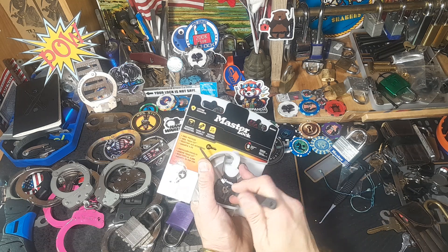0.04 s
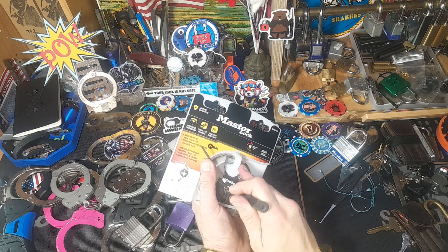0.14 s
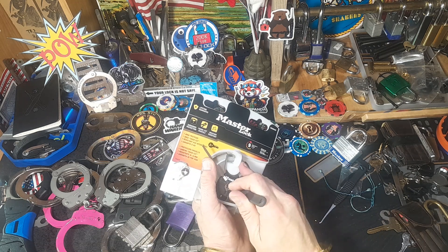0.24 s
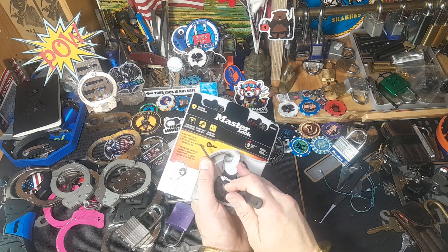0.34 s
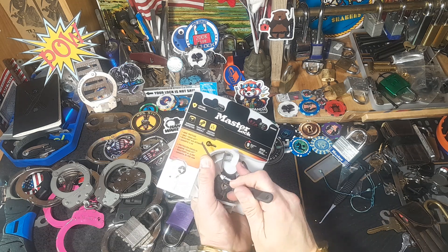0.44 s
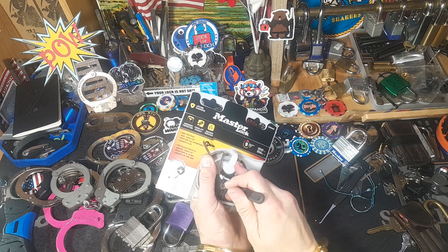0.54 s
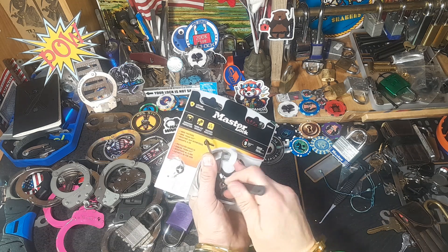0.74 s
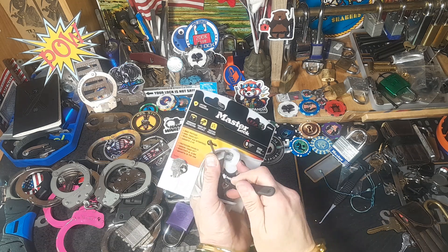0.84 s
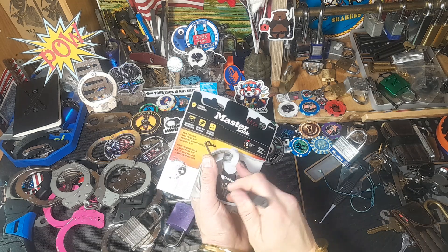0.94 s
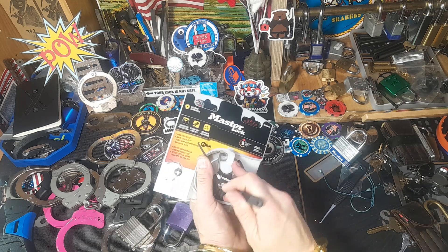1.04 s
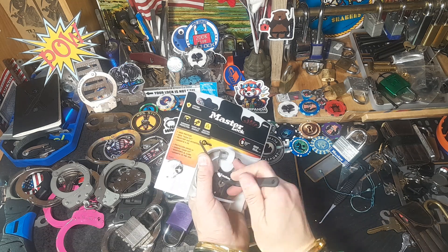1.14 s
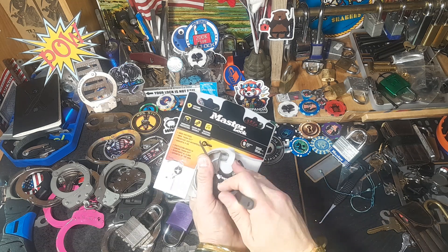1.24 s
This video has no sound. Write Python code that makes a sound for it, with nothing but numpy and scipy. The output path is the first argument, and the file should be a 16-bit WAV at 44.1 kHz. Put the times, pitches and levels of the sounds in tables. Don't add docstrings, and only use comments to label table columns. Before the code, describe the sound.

A metal pick rakes a padlock's pins, making sharp irregular clicks, gritty scratches and brief rings.

```python
import sys
import numpy as np
from scipy import signal
from scipy.io import wavfile
from scipy.ndimage import uniform_filter1d

SR = 44100
rng = np.random.default_rng(int(sys.argv[2]) if len(sys.argv) > 2 else 0)


def boost(x):
    u = np.asarray(x, float) / 20
    return 10 ** u


def log_audio(samples):
    frames = np.atleast_2d(samples).T
    limited = np.clip(frames, -1, 1)
    pcm = np.round(limited * 32767).astype(np.int16)
    wavfile.write(sys.argv[1], SR, pcm)


N = 57330

# f/Hz, level/dB per Hz
AIR_SPECTRUM = [(50, 10.5), (100, 8.5), (400, 7), (800, -11), (1300, -2.5), (3200, -5.5), (8000, -7.5),
                (15000, -18)]
# f/Hz, width/Hz, level/dB
HUM_BANDS = [(92.3, 30, 2.5), (176.7, 13.2, -1.5), (273.2, 13, -7), (336.6, 20, -7.5)]
# t/s, level/dB
HUM_SWELL = [(0, -77), (.2, -78.5), (.3, -71.5), (.4, -78.5), (.49, -68.5), (.6, -75), (.7, -71.5),
             (.9, -77.5), (1.3, -93)]
# start t/s, length t/s, start level/dB, end level/dB, centre
# f/Hz
SCRAPES = [(0, 0.031, -54.5, -70, 5360), (0.21, 0.014, -53.5, -38, 9400), (0.2258, 0.0046, -33, -28, 14200),
           (0.426, 0.016, -47.5, -61, 8000), (0.4423, 0.0075, -50, -31.5, 12400),
           (0.592, 0.011, -60, -55.5, 8100), (0.6264, 0.011, -42.5, -38, 14000),
           (0.8044, 0.065, -50.5, -70.5, 7060), (0.819, 0.0039, -44, -40.5, 9800),
           (0.917, 0.0075, -55.5, -52, 4340), (0.9717, 0.0098, -48, -38.5, 8000),
           (1.136, 0.071, -62, -71, 3700), (1.24, 0.05, -54, -66.5, 6900), (0.23, 0.054, -35, -53.5, 4400),
           (0.636, 0.056, -34, -51.5, 4170), (1.0752, 0.0075, -57, -62, 7500),
           (1.111, 0.0046, -62, -66, 14500), (1.163, 0.0079, -49.5, -56.5, 9000),
           (.452, 0.045, -55.5, -58, 8000), (0.625, 0.025, -35, -62, 12500)]
# f/Hz, level/dB, t60/s
ROOM_BANDS = [(310, -7, 0.15), (1170, -6.5, 0.16), (3240, -12.5, 0.097), (8000, -14.5, 0.18),
              (14000, -8.5, 0.13)]
TICK_TIMES = [0.0193, 0.0703, 0.1647, 0.1787, 0.1955, 0.204, 0.2139, 0.2165, 0.229, 0.3548, 0.388, 0.4273,
              0.4383, 0.4501, 0.5984, 0.6297, 0.6353, 0.7791, 0.8091, 0.8242, 0.9196, 0.9601, 0.9775,
              1.0774, 1.1408, 1.1651, 1.1798, 1.2373, 1.2503, 1.2916, .4462, .8183, .8259, .8285, .9762,
              .9812, .9830, 1.2385, 1.2567, 1.2350]
# middle level/dB, low level/dB, high level/dB
TICK_LEVELS = [(-68, -66, -55), (-47, -86, -53.5), (-41, -38, -39.5), (-41.5, -38, -73), (-58, -43.5, -49),
               (-45, -56, -57), (-56, -38, -29), (-36, -31, -25), (-24, -16, -38), (-47, -74, -50),
               (-49, -68, -48), (-59, -44, -39), (-47, -45, -27), (-33, -36, -20.5), (-32.5, -36.5, -34.5),
               (-32, -26, -42), (-33, -34, -21.5), (-43, -38.5, -50), (-30, -37.5, -66), (-32, -60, -24.5),
               (-73, -37, -76), (-47, -57, -60), (-34.5, -26.5, -25.5), (-50, -55, -61),
               (-45.5, -72, -44.5), (-42, -50, -46), (-38, -25.5, -50), (-31.5, -36, -32.5),
               (-30.5, -49, -23), (-58, -40, -76), (-31.5, -27, -46), (-33, -70, -58), (-23, -60, -43),
               (-35.5, -70, -41), (-32.5, -39, -36), (-19.5, -30, -21.5), (-27, -27, -27), (-41, -43, -53),
               (-48, -55, -42), (-51, -73, -54)]
# f/Hz, level/dB
PIN_MODES = [(1700, -15), (2450, -2), (3100, -5), (3800, -9), (5500, 0), (6800, 0), (8000, 1), (10500, 0),
             (12200, 4), (13800, 5), (15200, 8)]
SQUEAK_HZ = 7600, 10200
# middle t/s, half length t/s, lower tone level/dB, upper tone level/dB
SQUEAK_BLIPS = [
    (0.076, 0.017, -82, -70),
    (0.097, 0.012, -54.5, -69),
    (0.118, 0.011, -63.5, -66),
    (0.142, 0.013, -53, -56),
]
KNOCK_TIMES = [.2250, .2293, .2352, .2419, .2438, .2454, .2498, .4537, .4553, .4575, .4620, .5450, .6385,
               .6423, .6470, .6575, .6638, .6715, .8200, .9840, 1.0250, 1.1795, 1.2505]
# snap level/dB, ring level/dB, thump level/dB, low modes level/dB, high modes level/dB
KNOCK_LEVELS = [(-17.5, -31, -80, 1, -3), (-10, -20.5, -44, 4.5, 2), (-21, -22, -52, -13, -13),
                (-6, -24.5, -60, -8.5, -5), (-9.5, -32, -55, -7, -14), (-14.5, -20.5, -68, 0.5, 6),
                (-30, -30, -42, 0, 7), (-16.5, -42, -47.5, -9, -12), (-16, -25.5, -47.5, -1.5, 0),
                (-13.5, -26, -48.5, -18, -13), (-32, -34, -49, 4, 3), (-76, -78, -57.5, -3, 0),
                (-9.5, -28, -41.5, 4, 3), (-22, -33, -43, -19, -12), (-14, -27, -40.5, -28, 0),
                (-21, -35, -40, -2, 3), (-11, -24, -43, -4, -2.5), (-23, -24, -43, -3, -3),
                (-45, -65, -52.5, -22, 6), (-22.5, -32, -46.5, -2, -1), (-65, -55, -54.5, 5, -3),
                (-37.5, -79, -81, 6, 12), (-30.5, -56, -62, 8.5, -12)]
# f/Hz, level/dB
SNAP_MODES = [(2396, -4), (3103, -3.5), (3345, -5.5), (5565, -3), (1388, -17.5)]
# f/Hz, level/dB, t60/s
BODY_MODES = [(1770, -22, .08), (2340, -11, .06), (2800, -14, .05), (3150, -4, .03), (3280, -8, .055),
              (3370, -3, .03), (3530, -5, .03), (3700, -6, .05), (3900, -8, .045), (4700, -18, .05),
              (5310, -9, .04), (5800, -13, .04), (6490, -11, .055)]
# f/Hz, level/dB
CARD_MODES = [(310, -4), (430, -3.5), (530, -3.5), (640, -5), (1050, -4), (1400, 0)]
# f/Hz, level/dB, t60/s
SHACKLE_MODES = [(2340, 0, .2), (3330, 0, .14)]
# t/s, lower mode level/dB, upper mode level/dB
CLANGS = [
    (.2454, -42, -51),
    (.4575, -50.5, -51),
    (.6638, -54.5, -37.5),
    (1.1795, -57.5, -77),
    (1.2505, -60, -75),
]

LAG_S, LEAN_DB = 3e-5, 3.5
OPPOSITE = np.array([[1], [-1]])


def unit(x):
    return x / np.sqrt(np.mean(x ** 2))


def band(x, hz, width):
    hz_safe = min(hz, .45 * SR)
    return signal.lfilter(*signal.iirpeak(hz_safe, hz / width, fs=SR), x)


def walk(rate):
    hold = int(SR / rate)
    steps = np.repeat(rng.standard_normal(N // hold + 1), hold)
    return 1.5 * uniform_filter1d(uniform_filter1d(steps, hold), hold)[:N]


def ports(hz, turn):
    phase = turn + 2 * np.pi * hz * LAG_S
    return boost(OPPOSITE * LEAN_DB / 2) * np.exp(.5j * phase * OPPOSITE)


def strike(times, db, modes, t60, scatter_db, detune, push_s, turn_rad, count):
    chatter_s, chatter_db, grit_per_s = 0.0025, -13.5, 4000
    out = np.zeros((2, N + SR))
    hz = np.repeat(modes[:, 0], count)
    mode_db = np.repeat(modes[:, 1], count)
    t60 = np.repeat(t60 * np.ones(len(modes)), count)
    t = np.arange(int(t60.max() * SR)) / SR
    short = np.arange(600)
    for s, hit_db in zip(times, np.repeat(db, count, axis=1)):
        pitch_luck, level_luck, phase_luck, turn_luck = rng.standard_normal((4, len(hz)))
        f = hz * (1 + detune * pitch_luck)
        decay = np.log(1000) / t60
        rings = np.exp(np.outer(2j * np.pi * f - decay, t)) * (1 - np.exp(-t / push_s))
        turn = turn_rad * turn_luck * (0.94 + f / 7000)
        gains = boost(hit_db + mode_db + scatter_db * level_luck) * ports(f, turn)
        gains = gains * np.exp(1j * (count - 1) * phase_luck)
        grit = boost(chatter_db) * rng.standard_normal(600) * (rng.random(600) < grit_per_s / SR)
        contact = (short == 0) + grit * np.exp(-short / (chatter_s * SR))
        hit = signal.fftconvolve((gains @ rings).imag, [contact], axes=1)
        start = int(s * SR)
        out[:, start:start + hit.shape[1]] += hit
    return out[:, :N] / np.sqrt(len(hz))


def air():
    hiss, spectrum = 0, np.array(AIR_SPECTRUM)
    for hz in 25 * 2 ** np.arange(0, 9.6, .5):
        mid, side = band(rng.standard_normal((2, N)), hz, hz / 3)
        db = np.interp(np.log(hz), np.log(spectrum[:, 0]), spectrum[:, 1]) + 0.69 * walk(7.0)
        width = min(0.54 + hz / 8000, 1)
        hiss = hiss + boost(db) * (mid + width * side * OPPOSITE)
    out = unit(hiss) * boost(-68)
    swell_db = np.interp(np.arange(N) / SR, *np.array(HUM_SWELL).T)
    for hz, width, db in HUM_BANDS:
        rough = band(rng.standard_normal((2, N)), hz, 1.4 * width)
        mid, side = unit(band(rough, hz, 1.3 * width))
        out = out + boost(db + swell_db) * (mid + 0.34 * side * OPPOSITE)
    return out


def scrapes():
    grains_per_s, uneven_db, settle_s, release_s = 16000, 2, .0025, 0.0041
    out, t = 0, np.arange(N) / SR
    for s, length, from_db, to_db, hz in SCRAPES:
        grit = rng.standard_normal((2, N)) * boost(uneven_db * rng.exponential(size=N))
        grit = grit * (rng.random(N) < grains_per_s / SR)
        u = (t - s) / length
        shape = boost(from_db + (to_db - from_db) * np.clip(u, 0, 1))
        shape = shape * np.clip((t - s) / settle_s, 0, 1) ** 2
        shape = shape * np.exp(-np.clip(u - 1, 0, None) * length / release_s)
        mid, side = unit(band(grit, hz, hz) + 0.28 * np.diff(grit, prepend=0)) * shape
        pair = np.array([mid + .5 * side, np.roll(mid, 1) - .5 * side])
        out = out + pair * ports(0, 0).real
    return out


def room(x):
    alike = 0.057
    t = np.arange(int(.4 * SR)) / SR
    noise = rng.standard_normal((len(ROOM_BANDS), 2, len(t)))
    tail = 0
    for n, (hz, db, t60) in zip(noise, ROOM_BANDS):
        tail = tail + boost(db) * band(n, hz, 1.146 * hz) * np.exp(-np.log(1000) * t / t60)
    tail = tail * np.clip(t / 0.001 - .5, 0, 1) / np.sqrt(0.007 * SR)
    pair = np.sqrt(1 + alike) * tail[0] + np.sqrt(1 - alike) * tail[1] * OPPOSITE
    return signal.fftconvolve(pair, x.mean(axis=0, keepdims=True), axes=1)[:, :N]


def pins():
    levels, modes = np.array(TICK_LEVELS), np.array(PIN_MODES)
    hz = modes[:, 0]
    column = np.where(hz < 4500, 1, np.where(hz < 9000, 0, 2))
    t60 = .006 * np.sqrt(2300 / hz)
    return strike(TICK_TIMES, levels[:, column] + 5, modes, t60, scatter_db=0.53, detune=0.066,
                  push_s=.00008, turn_rad=0.85, count=4)


def squeak():
    t, out = np.arange(N) / SR, 0
    for k, hz in enumerate(SQUEAK_HZ):
        shape = 0
        for blip in SQUEAK_BLIPS:
            swell = np.cos(np.clip((t - blip[0]) / blip[1], -1, 1) * np.pi / 2)
            shape = shape + boost(blip[k + 2]) * swell
        phase = 2 * np.pi * np.cumsum(hz * (1 + 0.0013 * walk(60))) / SR
        sides = ports(hz, 0.15)[::-1]
        out = out + (shape * 1.33 * sides * np.exp(1j * phase)).imag
    return out


def body():
    snap_db, ring_db, thump_db, low_db, high_db = np.array(KNOCK_LEVELS).T[:, :, None]
    snap, ring, card = np.array(SNAP_MODES), np.array(BODY_MODES), np.array(CARD_MODES)

    def place_db(hz):
        return low_db * (hz < 2700) + high_db * (hz > 4400)

    snaps = strike(KNOCK_TIMES, snap_db + place_db(snap[:, 0]), snap, .006, scatter_db=0.8, detune=0.02,
                   push_s=0.0003, turn_rad=.25, count=1)
    rings = strike(KNOCK_TIMES, ring_db + place_db(ring[:, 0]), ring, ring[:, 2], scatter_db=1.5,
                   detune=0.0177, push_s=0.00048, turn_rad=1.0, count=4)
    thumps = strike(KNOCK_TIMES, thump_db + 0 * card[:, 0], card, 0.066, scatter_db=1.8, detune=0.0972,
                    push_s=0.0024, turn_rad=0.3, count=5)
    return snaps + rings + thumps


def shackle():
    clangs, modes = np.array(CLANGS), np.array(SHACKLE_MODES)
    return strike(clangs[:, 0], clangs[:, 1:], modes, modes[:, 2], scatter_db=1.5, detune=.011,
                  push_s=.002, turn_rad=.4, count=4)


def scene():
    no_bass = signal.butter(3, 1300, "high", fs=SR, output="sos")
    small = signal.sosfilt(no_bass, pins() + scrapes())
    lock = small + body() + shackle() + squeak()
    return lock + room(lock) + air()


def low_pass(x):
    return signal.sosfilt(signal.butter(12, 16810, fs=SR, output="sos"), x)


def record(dry):
    bottom = signal.butter(2, 38, "high", fs=SR, output="sos")
    top = signal.ellip(5, .5, 22, 15900, fs=SR, output="sos")
    mix = signal.sosfilt(np.vstack([bottom, top]), dry)
    return low_pass(mix)


dry = scene()
out = record(dry)
log_audio(out)
```